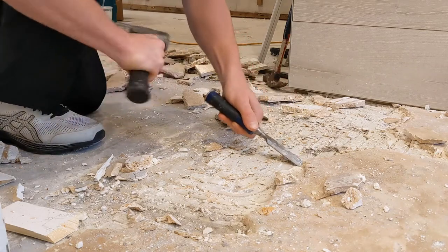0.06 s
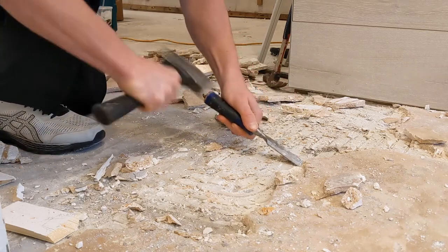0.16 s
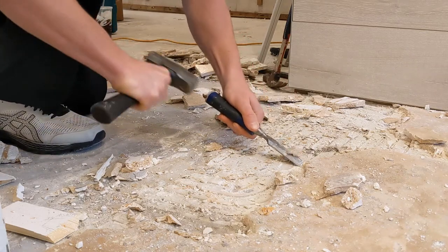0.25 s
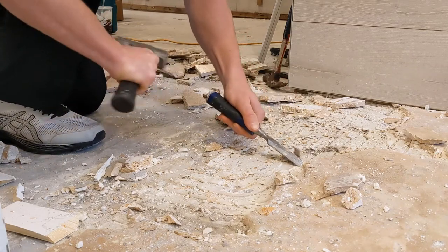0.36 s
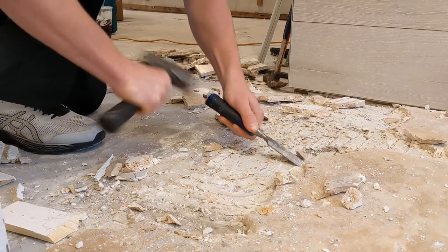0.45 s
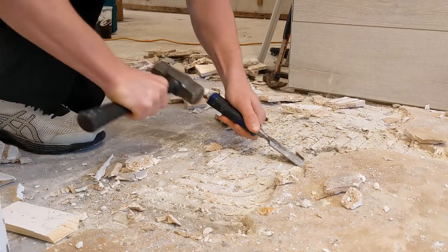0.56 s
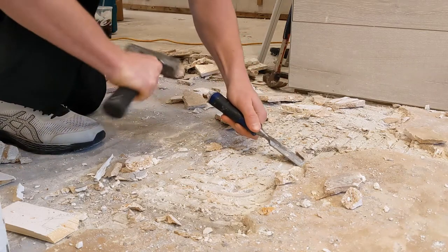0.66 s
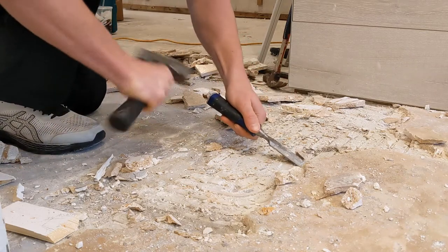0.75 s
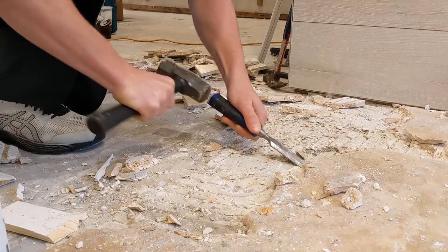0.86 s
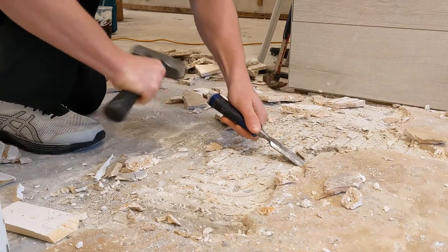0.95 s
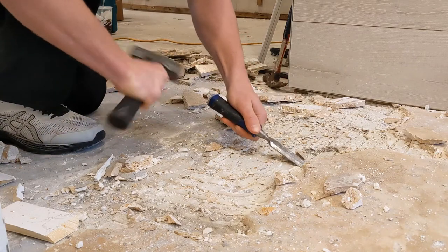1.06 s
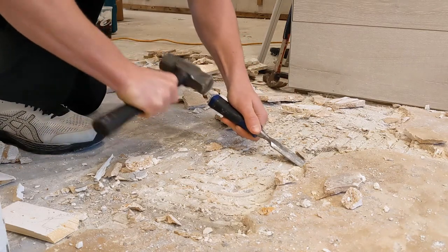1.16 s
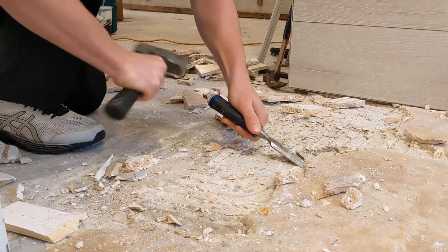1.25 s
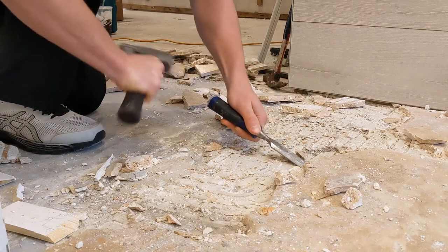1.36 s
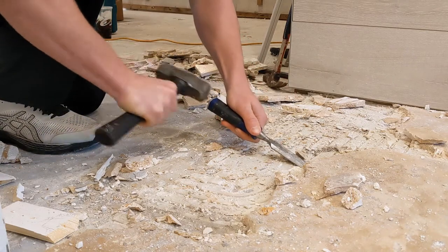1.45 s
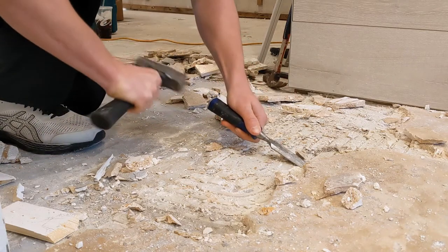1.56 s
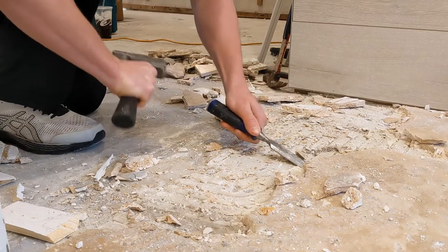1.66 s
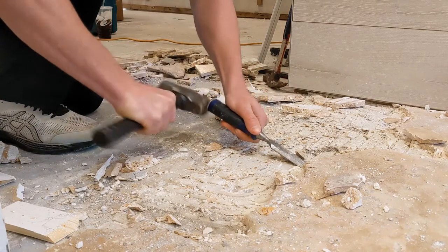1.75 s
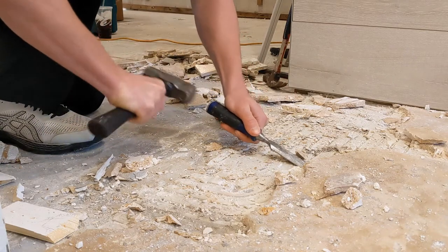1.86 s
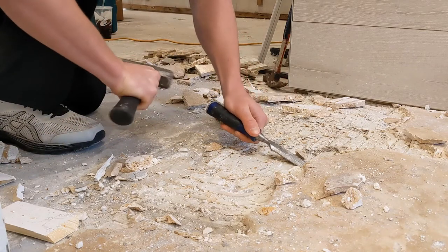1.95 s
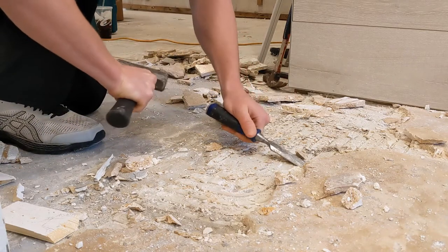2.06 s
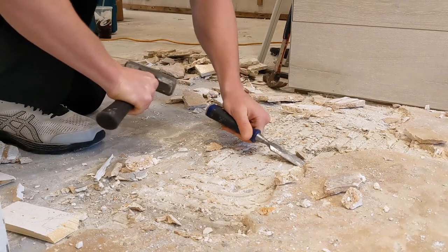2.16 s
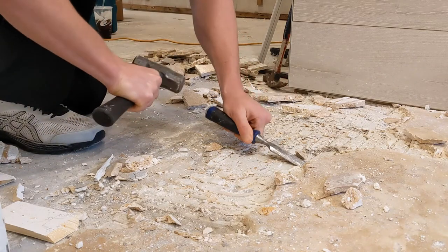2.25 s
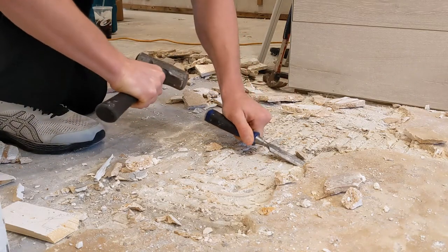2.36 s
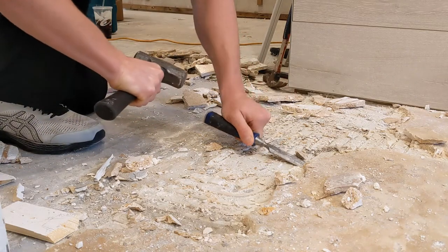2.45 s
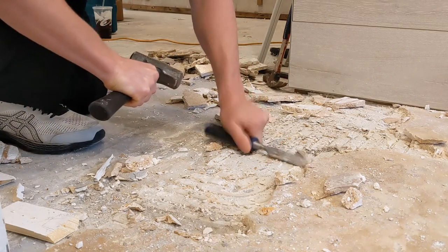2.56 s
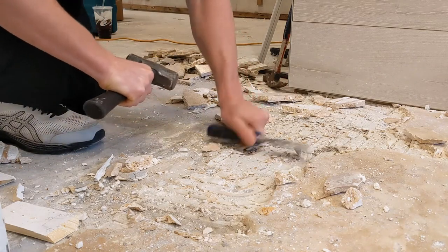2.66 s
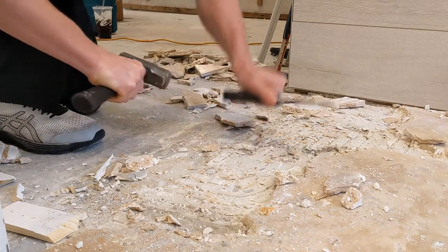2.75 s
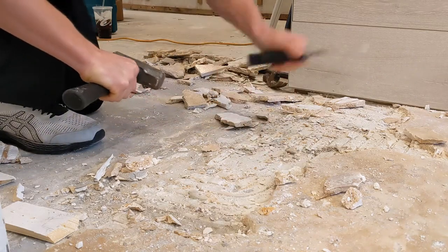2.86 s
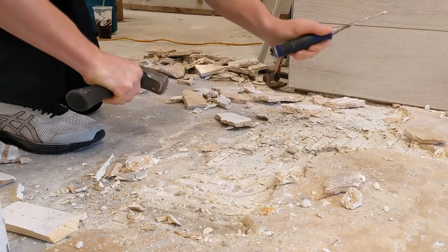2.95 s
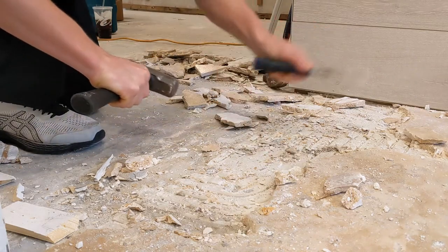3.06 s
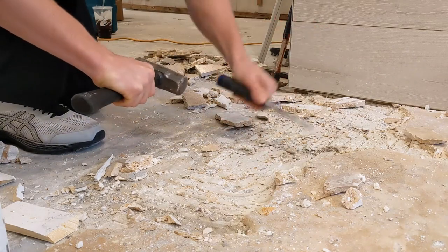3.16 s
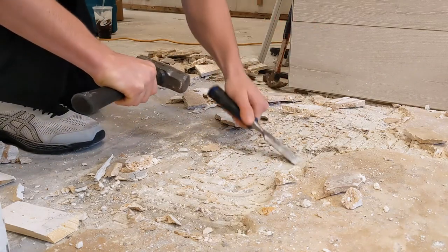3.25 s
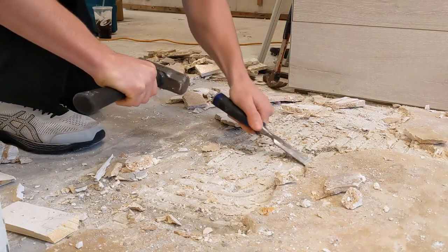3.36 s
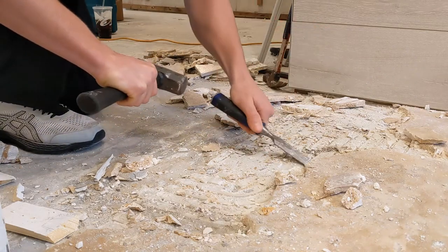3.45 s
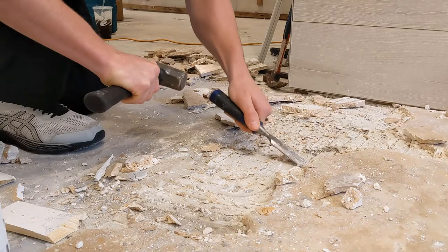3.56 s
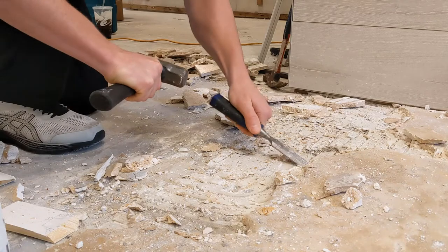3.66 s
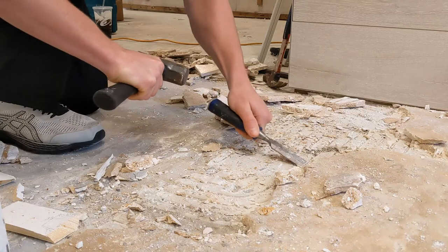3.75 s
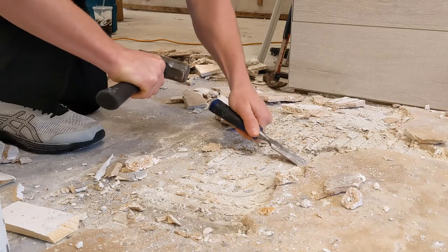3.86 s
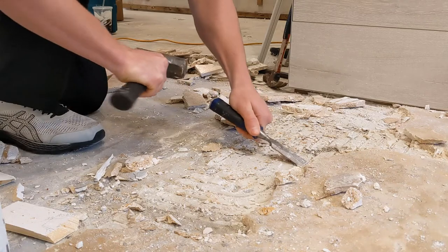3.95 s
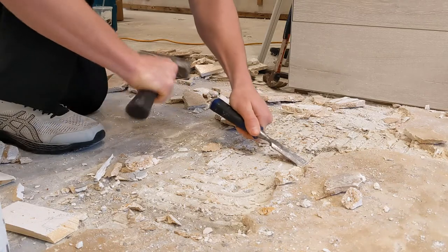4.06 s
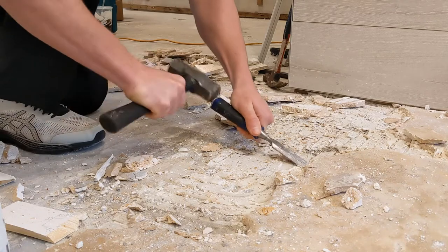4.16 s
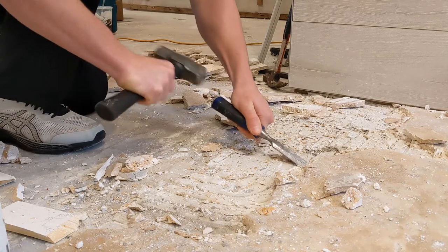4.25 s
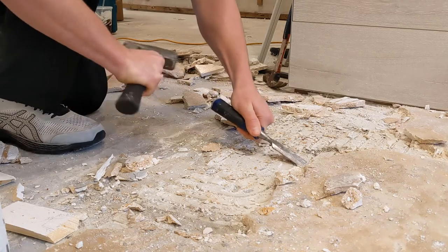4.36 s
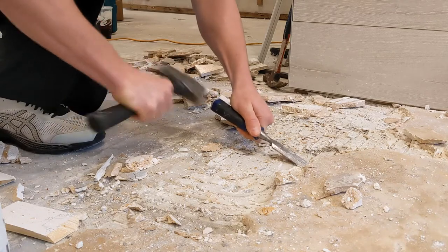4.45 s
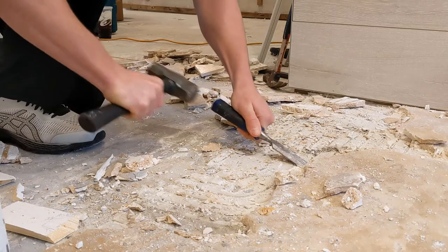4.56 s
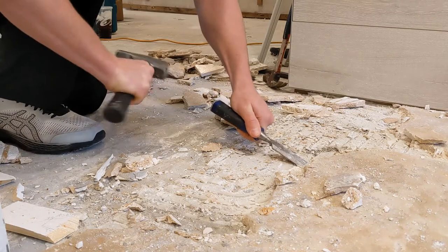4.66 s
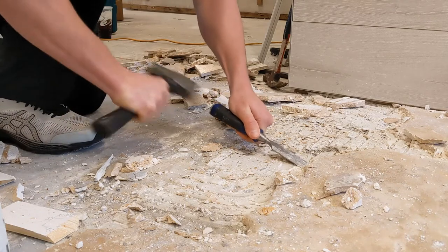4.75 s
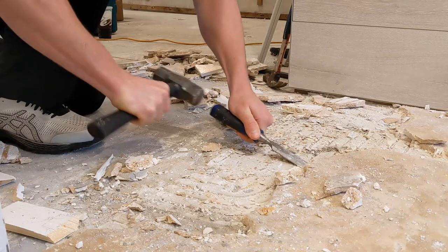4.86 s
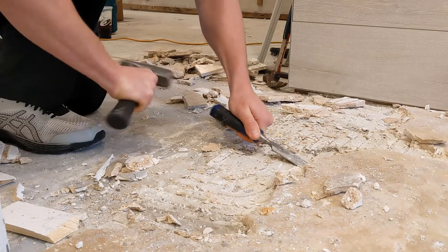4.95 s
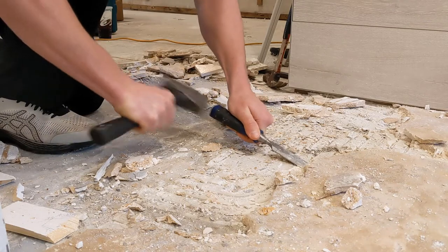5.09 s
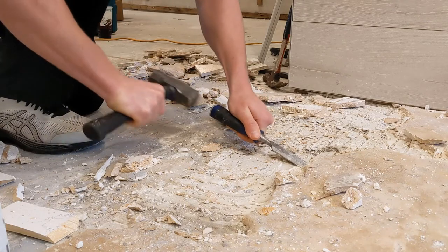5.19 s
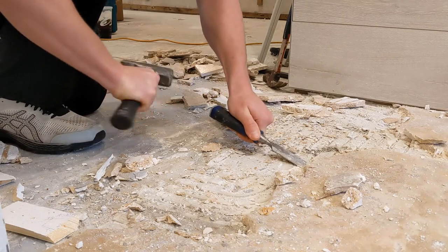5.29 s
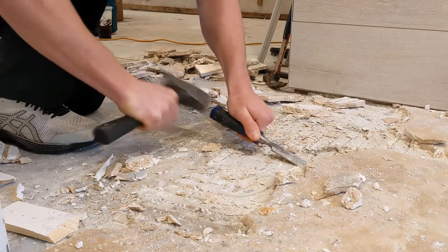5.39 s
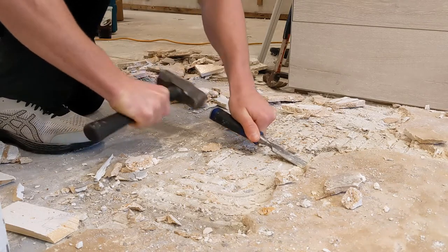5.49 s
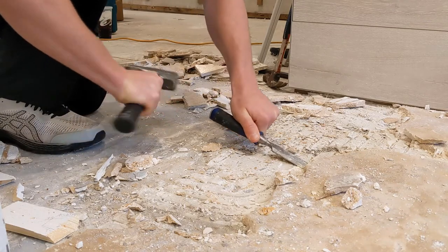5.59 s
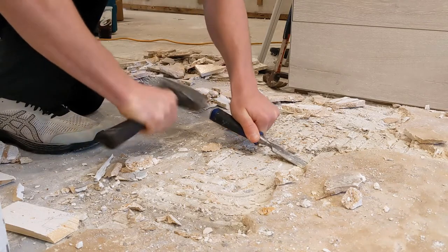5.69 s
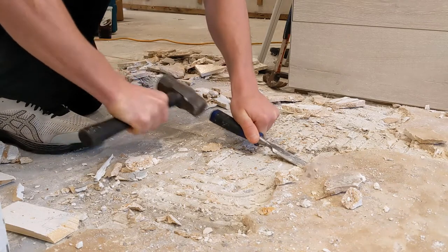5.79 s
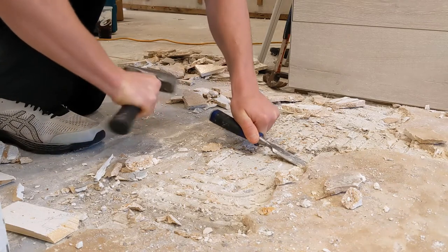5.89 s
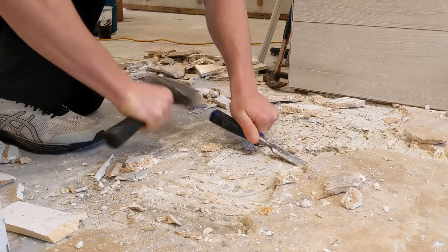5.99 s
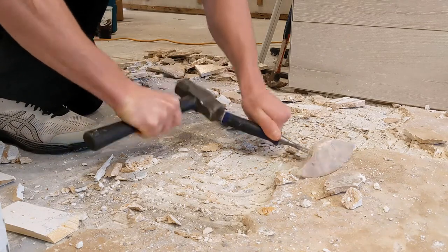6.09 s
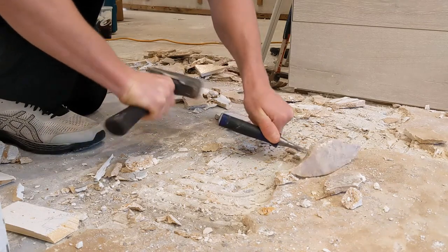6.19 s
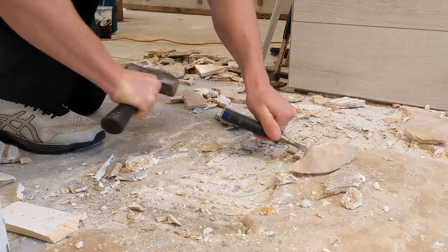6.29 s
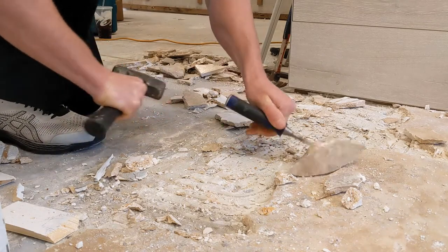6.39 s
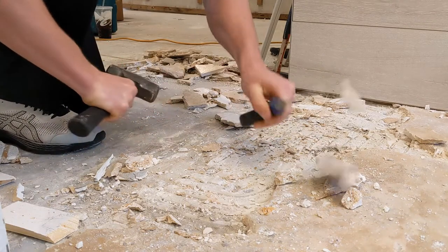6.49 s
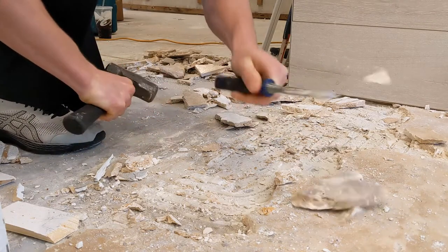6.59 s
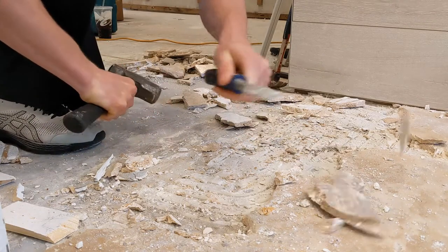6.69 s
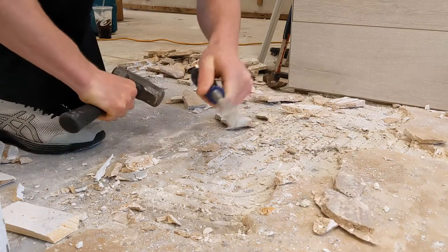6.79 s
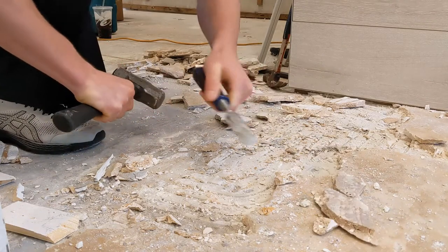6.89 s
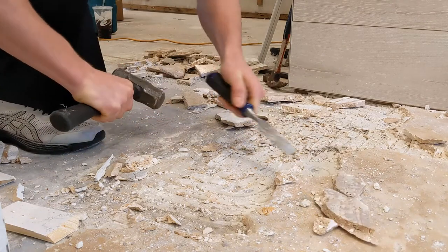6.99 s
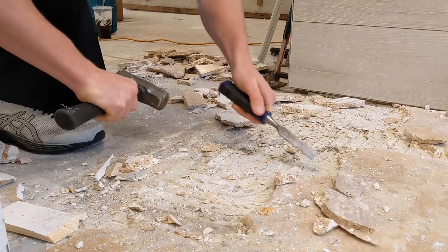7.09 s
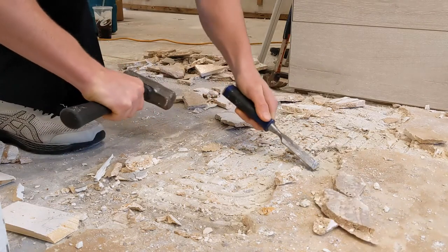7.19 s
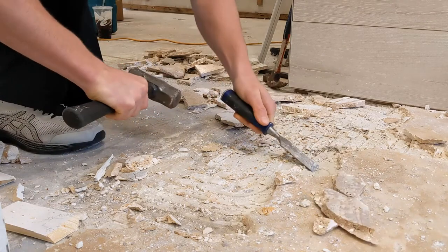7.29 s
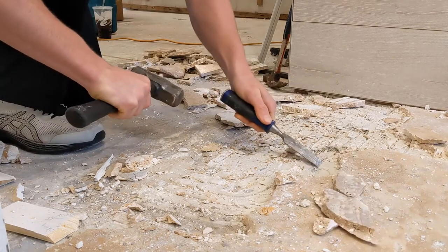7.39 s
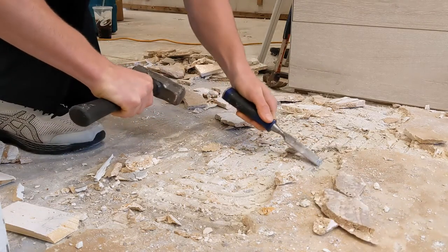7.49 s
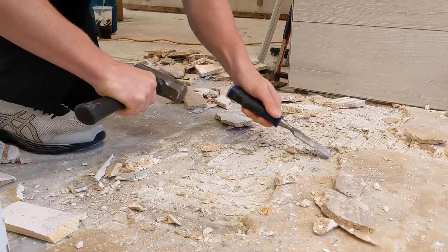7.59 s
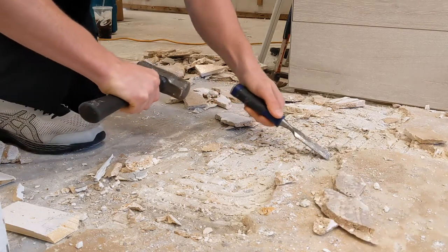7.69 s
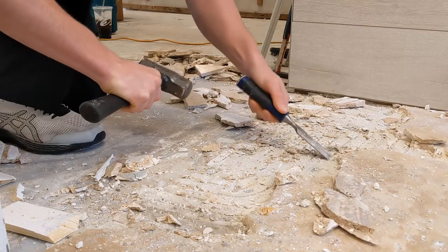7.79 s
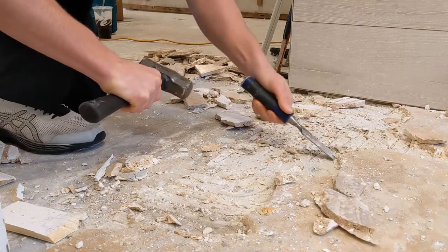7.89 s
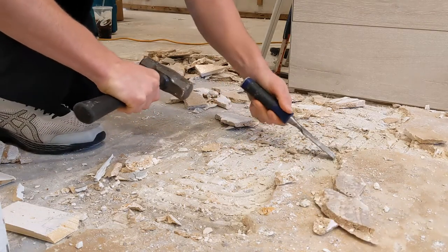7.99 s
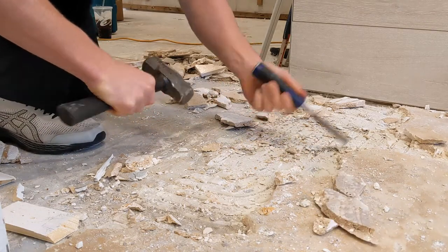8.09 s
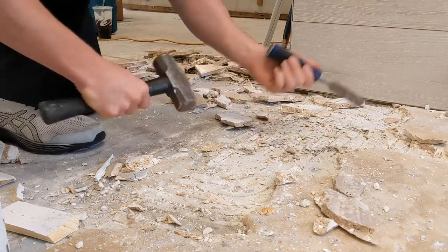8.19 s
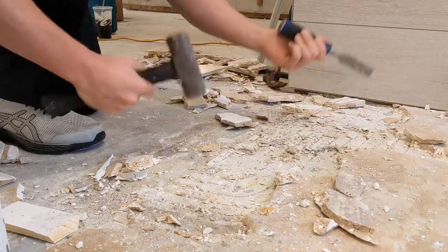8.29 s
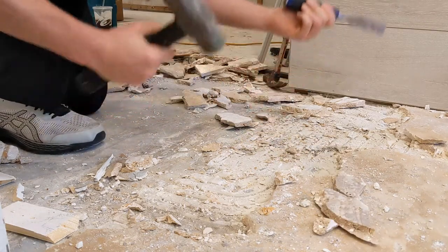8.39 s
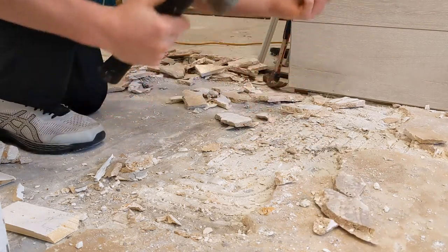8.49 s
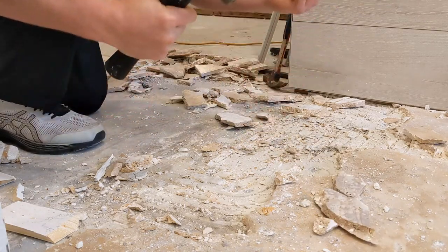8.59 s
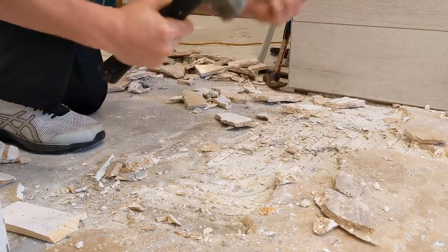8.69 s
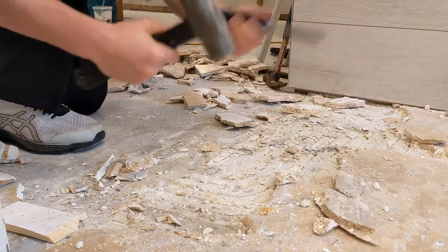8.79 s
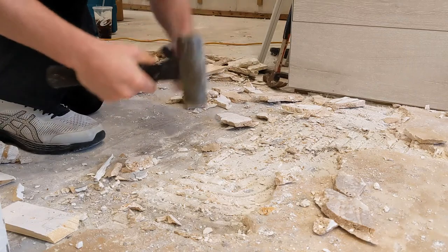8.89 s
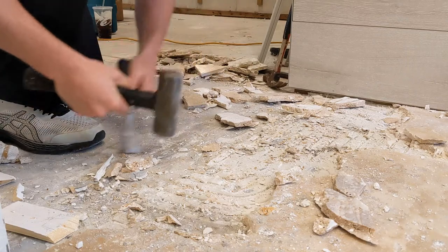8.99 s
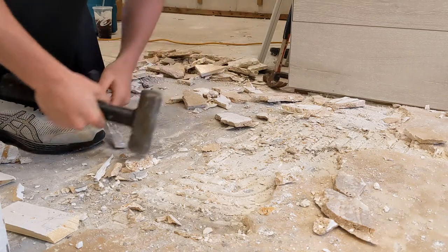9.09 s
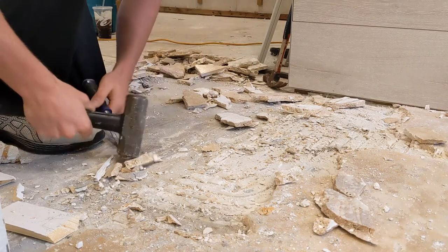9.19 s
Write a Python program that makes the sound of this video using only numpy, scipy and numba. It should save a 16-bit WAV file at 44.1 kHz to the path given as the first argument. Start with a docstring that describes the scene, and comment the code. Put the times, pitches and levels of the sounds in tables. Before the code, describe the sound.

Sharp, steady hammer blows on a metal chisel ring indoors, pause for faint scraping, then resume until tile shards clink onto concrete.

```python
"""A club hammer drives a steel chisel under floor tile in a bare, hard room, close to a phone.
Each blow trips the phone's limiter: it ducks just ahead, holds, then lets the room's ring swell back.
In a pause a low hum sets in and stops while the chisel tip taps and scrapes. A second run of blows
follows. Tile shards clink away, the tip works the rubble again, and the hammer is laid down."""
import sys
import numpy as np
from scipy import signal
from scipy.fft import rfft, irfft
from scipy.io import wavfile
from scipy.ndimage import minimum_filter1d
from numba import njit

SR = 44100
rng = np.random.default_rng(int(sys.argv[2]) if len(sys.argv) > 2 else 0)


def master(y):
    """Save y as 16-bit WAV."""
    cut = np.clip(np.atleast_2d(y).T, -1, 1)
    pcm = np.round(cut * 32767)  # scale
    wavfile.write(sys.argv[1], SR, pcm.astype(np.int16))


N = 407484
LEAD = SR // 2  # samples before time zero

# blows (time [s], force [dB], blade [Hz], blade [dB], hollow tile [dB], jolt [dB], rebound [dB],
# shank [dB], shank [Hz])
HAMMER_BLOWS = [(-.097, 17, 1820, 9.5, -11, -20, -31, -5.5, 5200),
                (.222, 18.5, 1820, 10, -25.5, -7.5, -30.5, 2, 5000),
                (.539, 17.5, 1804, 16.5, -24, -13.5, -6, -1.5, 5000),
                (.850, 16, 1600, 10, -15.5, -26, -15.5, 0, 5240),
                (1.166, 14.5, 1690, 17.5, -12, -20.5, -24, 4.5, 5990),
                (1.486, 16.5, 1720, 13.5, -18.5, -16.5, -27.5, -3.5, 5300),
                (1.808, 16.5, 1740, 6, -16, -3.5, -40.5, 2, 5160),
                (4.1979, 11.5, 1800, 15.5, -3, -8.5, -4, 6.5, 5370),
                (4.529, 15, 1610, 14.5, -24, -6, -36, 0, 5540),
                (4.841, 17, 1730, 13, -16, -12, -33.5, 0, 5700),
                (5.157, 16.5, 1784, 14.5, -13, -17, -33.5, -2, 5220),
                (5.456, 17, 1820, 8, -7.5, -16, -36, -2, 5980),
                (5.760, 15.5, 1960, 9, 2.5, -16.5, -39, -1.5, 5010),
                (6.072, 15.5, 1796, 15, 5, -25.5, -17.5, 0.5, 5120)]
# steel on steel and mortar (frequency [Hz], level [dB])
STEEL_SPECTRUM = [(200, -35.5), (400, -5.5), (700, -9), (1200, -3), (2000, -9), (2800, -8), (3800, -8),
                  (5000, 0), (6500, -6), (8800, 0), (10500, -6), (12300, -15), (14500, -16), (17000, -17.5)]
# lone jolts through the slab (time [s], level [dB])
SLAB_JOLTS = [(2.221, -18), (2.644, -34), (6.459, -31)]
# chisel on floor (time [s], level [dB], grit [dB], knock [dB], lowest mode [dB])
TIP_TAPS = [(2.589, -24, 3, -43, -6), (2.642, -13, -34, -31.5, -6), (3.3265, -30, -6.5, -13, -2),
            (3.5652, -36, -9, 5.5, -10), (3.6594, -36, -7, -29, -10), (3.7696, -47.5, 5, -42, -7),
            (6.4723, -19, -25, -11, -1), (7.2846, -32.5, -5, -40, 7.5), (7.3575, -36.5, -22, 0, 0),
            (7.4213, -28, -29, -21, 0), (7.554, -24, -31, -25, -10.5), (7.67, -30.5, -6, -23, -3),
            (7.889, -51, -20, -14, -5), (8.098, -40.5, 3, -19, 5), (8.1636, -39, -18, -3.5, -1),
            (8.5551, -49.5, 1, -26.5, -7.5)]
# tip dragged over concrete (start [s], swell [s], peak [dB], grit [dB], lowest mode [dB])
TIP_DRAGS = [(2.588, 0.053, -38.5, 2.5, -6), (3.329, 0.076, -41.5, -9.5, 2),
             (3.532, 0.027, -37.5, -8.5, -9.5), (6.421, .055, -33, -1, 5.5),
             (7.35, 0.042, -39.5, -6.5, -3.5), (7.55, 0.047, -55, -8, -10), (7.886, 0.062, -44, -5, -4),
             (9.053, 0.02, -35, -4.5, 0)]
# mortar grit (frequency [Hz], level [dB])
GRIT_SPECTRUM = [(300, -14.5), (1200, -1.5), (2800, -8), (4700, -3), (6500, -12.5), (9000, -12.5),
                 (12000, -17), (16000, -24)]
# shards landing (time [s], level [dB], clink [dB], crack [dB])
SHARD_LANDINGS = [(6.453, -24, -2, -2), (6.576, 6, -5.5, -21.5), (6.849, -10, -39, -4)]
# the lowered hammer's first touches on a tile piece (time [s], level [dB])
PIECE_NUDGES = [(9.053, -25.5), (9.066, -27), (9.079, -33), (9.104, -27)]

# modes (frequency [Hz], level [dB], T60 [s])
HOLLOW_MODES = [(349, -16, 0.032), (616, -6.5, 0.015), (845, -0.5, 0.015), (1010, -2.5, .009)]  # tile lifting off its bed
SLAB_MODES = [(62, -3, 0.08), (140, -2, 0.12), (270.2, -0.5, 0.043)]  # concrete floor
CHISEL_MODES = [(1340, -2.5, 0.011), (1873, -5, 0.03), (2213, -7.5, 0.013), (3350, -16.5, 0.0088),
                (4850, -15.5, 0.0055)]  # chisel held loosely
RUBBLE_MODES = [(497, -4, 0.034)]  # rubble under the tip
CLINK_MODES = [(2160, -6.5, 0.0042), (3770, 2, 0.0036), (4192, -0.5, 0.028), (5200, 3, 0.0035),
               (6190, 3.5, 0.0049), (6900, 0, 0.022), (8100, -14.5, 0.033), (8640, -23.5, 0.082)]  # shard ringing
CRACK_MODES = [(5500, 5.5, 0.0022), (8170, 15, 0.0022), (9900, 20.5, 0.00055), (13500, 14.5, 0.0015)]  # shard contact
FLAKE_MODES = [(13400, -32, 0.014), (11100, -33, 0.0038)]  # tiny flake
PIECE_MODES = [(426, -12.5, 0.036), (1290, -3.5, .03), (2240, -0.5, 0.025), (4800, -2.5, .006)]  # loose tile piece
LAID_MODES = [(140, -18, 0.032), (246.6, -15, 0.013), (400, -21, 0.025), (618, -17, 0.0103),
              (2240, -25, 0.0063), (5200, -1.5, 0.0034), (6900, -7.5, 0.0037), (7600, 0, 0.0014)]  # hammer laid on rubble

# room decay (frequency [Hz], T60 [s])
ROOM_DECAY = [(60, 1.2), (250, 0.47), (700, 1.31), (1800, 1.155), (4800, 1.08), (9000, 0.55), (14000, 0.8)]
# room tone (frequency [Hz], relative density [dB])
AIR_SPECTRUM = [(18, -55.5), (30, -36), (50, -9.5), (75, -22.5), (120, -14), (200, -24.5), (336, -31.5),
                (550, -29.5), (1720, -40.5), (5000, -44), (9000, -45.5), (16000, -61.5)]
# microphone ports (frequency [Hz], left minus right [dB])
PORT_BALANCE = [(60, -4), (250, 1.5), (700, -1.5), (2000, 1.5), (8000, 1), (14000, 1.5)]

CRUNCH_S, REBOUND_S = .0012, .00087
BLADE_WIDTH_HZ, BLADE_LATE_S = 294, .001473
FACE_HZ, FACE_DB, FACE_SCATTER_DB = 13100, 10, 1  # hammer face ring
SLAB_DB, SLAB_LOSS_DB_PER_DB = -18.5, .51  # hollow tile shields the slab
JOLT_MS, JOLT_HIGHPASS_HZ, JOLT_LEFT_DB = 1.33, 62, -12
SCRAPE_SWELL_DB, SCRAPE_FADE_S, SCRAPE_FADE_DB = 3, .054, 18
FLAKE_S, HAMMER_DOWN_S, SETTLE_STEP_S, SETTLE_STEP_DB = 2.879, 9.1775, .009, -12
HITS_NEAR_DB, TIP_WET_DB, PORT_LAG_SAMPLES = .5, -2, 1
BOUNCE_S, BOUNCE_DB = .0017, -8.5  # first echo, off floor and nearby board
ROOM_DB, ROOM_GAP_S, AIR_DB = -31.5, .00043, -64.5
HUM_S, HUM_HZ, HUM_DB = (2.2, 4.1), (84, 92), (-54.5, -64)  # each (start, end)
HUM_WAVER_DB, HUM_EDGE_S = 1.5, .058
BASS_CUT_HZ, TOP_CUT_HZ, CEILING_DB, START_GAIN_DB = 46, 16300, -1.5, -15.5
AHEAD_S, DUCK_S, HOLD_S, RELEASE_S = .011, .0013, .085, .028


def hammer():
    """Steel on steel: crunch, combing rebound, then tile and slab. Returns (sound, phone shake)."""
    out, shake = np.zeros((2, N + LEAD))
    faces_db = FACE_DB - FACE_SCATTER_DB * rng.standard_normal(len(HAMMER_BLOWS))
    for blow, face_db in zip(HAMMER_BLOWS, faces_db):
        time_s, force_db, blade_hz, blade_db, hollow_db, jolt_db, rebound_db, shank_db, shank_hz = blow
        steel = crunch(STEEL_SPECTRUM, CRUNCH_S, blade_hz, blade_db, shank_hz, shank_db, face_db)
        add(out, time_s, undb(force_db + 11.5) * steel)
        add(out, time_s + REBOUND_S, undb(force_db + 11.5 + rebound_db) * steel)
        tile = undb(hollow_db) * ring(HOLLOW_MODES, 1.1, detune=.068)
        shield_db = SLAB_LOSS_DB_PER_DB * max(hollow_db + 9.5, 0)
        slab = undb(SLAB_DB - shield_db) * ring(SLAB_MODES, 1, detune=.056)
        add(out, time_s + .001673, undb(force_db - 19.5) * (tile + slab))
        add(shake, time_s + .00025, undb(force_db + jolt_db) * jolt())
    for time_s, db in SLAB_JOLTS:
        add(shake, time_s, undb(db) * jolt())
    return out, shake


def crunch(spectrum, spread_s, blade_hz=1800, blade_db=0, shank_hz=5200, shank_db=0, face_db=0):
    """Impact with a smooth spectrum; band delays scatter over spread_s, the blade swings up late."""
    hz = np.fft.rfftfreq(SR // 10, 1 / SR)
    blade = bump(hz, blade_hz, BLADE_WIDTH_HZ)
    db = lookup(spectrum, hz) + blade_db * blade
    db += shank_db * bump(hz, shank_hz, 700) + face_db * bump(hz, FACE_HZ, 2000)
    scatter = np.interp(hz, np.linspace(0, SR / 2, 24), rng.random(24) ** 3)
    delay_s = .00033 + spread_s * scatter + BLADE_LATE_S * blade
    return irfft(undb(db) * np.exp(-2j * np.pi * np.cumsum(delay_s) * hz[1]))


def jolt():
    """Slab shock shakes the phone: one push, slow swing back."""
    push = np.zeros(SR // 10)
    n = int(JOLT_MS * SR / 1000)
    push[:n] = -np.hanning(n)
    return signal.sosfilt(signal.butter(2, JOLT_HIGHPASS_HZ, "high", fs=SR, output="sos"), push)


def taps():
    """Chisel touches the floor: steel ring, rubble knock, grit."""
    out = np.zeros(N + LEAD)
    for time_s, db, grit_db, knock_db, lowest_db in TIP_TAPS:
        steel = loose_chisel(lowest_db, scatter_db=2.5, detune=.031, rise_s=.00043)
        knock = undb(knock_db) * ring(RUBBLE_MODES, 0, detune=.026, rise_s=.00049)
        grit = undb(grit_db + 25.5) * crunch(GRIT_SPECTRUM, spread_s=.003)
        add(out, time_s, undb(db) * (steel + knock + grit))
    return out


def scrapes(catches_per_s=2500, spread_db=2.5):
    """Dense, uneven catches of the tip excite chisel and grit; each drag swells, then fades."""
    out = np.zeros(N + LEAD)
    n = SR // 5
    t = np.arange(n) / SR
    for start_s, swell_s, db, grit_db, lowest_db in TIP_DRAGS:
        caught = rng.random(n) < catches_per_s / SR
        catches = caught * undb(spread_db * rng.exponential(size=n)) * rng.choice([-1, 1], n)
        drag_db = np.interp(t, [0, swell_s, swell_s + SCRAPE_FADE_S],
                            [db - SCRAPE_SWELL_DB, db, db - SCRAPE_FADE_DB], right=-120)
        steel = undb(-7.5) * loose_chisel(lowest_db, scatter_db=3, detune=.022, rise_s=.00018)
        grit = undb(grit_db + 20.5) * crunch(GRIT_SPECTRUM, spread_s=.00056)
        add(out, start_s, signal.oaconvolve(catches * undb(drag_db), steel + grit))
    return out


def loose_chisel(lowest_db, **stroke):
    """One chisel ring; the grip sets the level of its lowest mode."""
    (hz, db, t60_s), *upper = CHISEL_MODES
    return ring([(hz, db + lowest_db, t60_s)] + upper, **stroke)


def small_hits():
    """Shards land, a flake pings, the lowering hammer first touches a tile piece; the hammer is laid down and
    rocks twice."""
    out = np.zeros(N + LEAD)
    for time_s, db, clink_db, crack_db in SHARD_LANDINGS:
        clink = undb(clink_db) * ring(CLINK_MODES, .34, detune=.0025)
        crack = undb(crack_db) * ring(CRACK_MODES, 1.1)
        add(out, time_s, undb(db) * (clink + crack))
    add(out, FLAKE_S, ring(FLAKE_MODES, 0, rise_s=.00034))
    for time_s, db in PIECE_NUDGES:
        add(out, time_s, undb(db) * ring(PIECE_MODES, 2, detune=.01, rise_s=.00016))
    for k in range(3):
        contact = undb(k * SETTLE_STEP_DB) * ring(LAID_MODES, .65, rise_s=.00012)
        add(out, HAMMER_DOWN_S + k * SETTLE_STEP_S, contact)
    return out


def ring(modes, scatter_db, detune=.0041, rise_s=.00015):
    """One stroke of decaying modes, scattered in pitch and level."""
    t = np.arange(SR // 10) / SR
    hz, db, t60_s = np.transpose(modes)[:, :, None]
    pitch_draw, level_draw = rng.standard_normal((2, len(modes), 1))
    waves = np.sin(2 * np.pi * hz * (1 + detune * pitch_draw) * t) * np.exp(-np.log(1000) * t / t60_s)
    signs = (-1.) ** np.arange(len(modes))[:, None]  # alternating: no notches between modes
    attack = 1 - np.exp(-t / rise_s)
    return attack * np.sum(undb(db + scatter_db * level_draw) * signs * waves, axis=0)


def room(x):
    """Dense echoes, decaying per octave band; bass partly alike at both ports."""
    n = 2 * SR
    t, hz = np.arange(n) / SR, np.fft.rfftfreq(n, 1 / SR)
    common, left, right = rfft(rng.standard_normal((3, n)))
    coherence = np.clip(.5 - hz / 2930, 0, 1)
    noise = np.sqrt(coherence) * common + np.sqrt(1 - coherence) * np.array([left, right])
    tail = np.zeros((2, n))
    for centre_hz in 40 * 2. ** np.arange(9):
        band = np.cos(np.pi / 2 * np.clip(np.log2((hz + 1) / centre_hz), -1, 1)) ** 2
        tail += irfft(noise * band) * np.exp(-np.log(1000) * t / lookup(ROOM_DECAY, centre_hz))
    tail *= np.clip(t / ROOM_GAP_S - .5, 0, 1)
    return undb(ROOM_DB) * signal.fftconvolve(x[None], tail, axes=1)[:, :len(x)]


def hum():
    """Low wavering tone; drifts up in pitch, fades, stops."""
    t = np.arange(N) / SR
    gate = np.clip(np.minimum(t - HUM_S[0], HUM_S[1] - t) / HUM_EDGE_S, 0, 1)
    waver_db = HUM_WAVER_DB * np.interp(t, np.linspace(0, t[-1], 50), rng.standard_normal(50))
    phase = 2 * np.pi * np.cumsum(np.interp(t, HUM_S, HUM_HZ)) / SR
    return gate * undb(np.interp(t, HUM_S, HUM_DB) + waver_db) * np.sin(phase)


def room_tone():
    """Faint, wide, bass-heavy noise."""
    colour = undb(lookup(AIR_SPECTRUM, np.fft.rfftfreq(N, 1 / SR)))
    mid, side = irfft(rfft(rng.standard_normal((2, N))) * colour, N)
    return undb(AIR_DB) * np.array([mid + .95 * side, mid - .95 * side]) / np.std(mid)


def undb(db):
    """dB to amplitude."""
    return 10 ** (np.asarray(db) / 20)


def lookup(table, hz):
    """Interpolate a table over log frequency."""
    knots_hz, values = np.transpose(table)
    return np.interp(np.log(hz + 1), np.log(knots_hz), values)


def bump(hz, centre_hz, width_hz):
    """Bell-shaped weight around a resonance."""
    return np.exp(-((hz - centre_hz) / width_hz) ** 2)


def add(track, time_s, sound):
    """Mix into a track that starts LEAD samples early."""
    i = int(time_s * SR) + LEAD
    track[i:i + len(sound)] += sound[:len(track) - i]


@njit
def glide(target_db, now_db, down, up):
    """Limiter gain smoothing: fast down, slow up."""
    gain_db = np.empty(len(target_db))
    for i in range(len(target_db)):
        now_db += (target_db[i] - now_db) * (down if target_db[i] < now_db else up)
        gain_db[i] = now_db
    return gain_db


def scene():
    """Direct and room sound at two microphone ports; jolts reach mostly the right one."""
    blows, shake = hammer()
    hits = blows + small_hits()
    tip = taps() + scrapes()
    near = undb(HITS_NEAR_DB) * hits + tip
    near += undb(BOUNCE_DB) * np.roll(near, int(BOUNCE_S * SR))
    direct = np.array([near, np.roll(near, PORT_LAG_SAMPLES)])
    wet = room(hits + undb(TIP_WET_DB) * tip)  # down in the rubble, the tip sends less to the walls
    jolts = undb([[JOLT_LEFT_DB], [0]]) * shake
    mix = (direct + wet + jolts)[:, LEAD:] + room_tone() + hum()
    balance_db = lookup(PORT_BALANCE, np.fft.rfftfreq(N, 1 / SR))
    return irfft(rfft(mix) * undb(np.array([balance_db, -balance_db]) / 2), N)


def record(dry):
    """Phone: bass cut, stereo-linked look-ahead limiter with hold, peak clamp, top cut."""
    dry = signal.sosfilt(signal.butter(3, BASS_CUT_HZ, "high", fs=SR, output="sos"), dry)
    peak_db = 20 * np.log10(np.abs(dry).max(axis=0) + 1e-9)
    target_db = np.minimum(CEILING_DB - peak_db, 0)
    ahead, hold = int(AHEAD_S * SR), int(HOLD_S * SR)
    span = ahead + hold + 1
    held_db = minimum_filter1d(np.pad(target_db, (hold, ahead)), span)[span // 2:span // 2 + N]
    gain_db = glide(held_db, START_GAIN_DB, 1 / (DUCK_S * SR), 1 / (RELEASE_S * SR))
    top_cut = signal.ellip(10, .2, 80, TOP_CUT_HZ, fs=SR, output="sos")
    return signal.sosfilt(top_cut, np.clip(dry * undb(gain_db), -.86, .86))


dry = scene()
out = record(dry)
master(out)
```